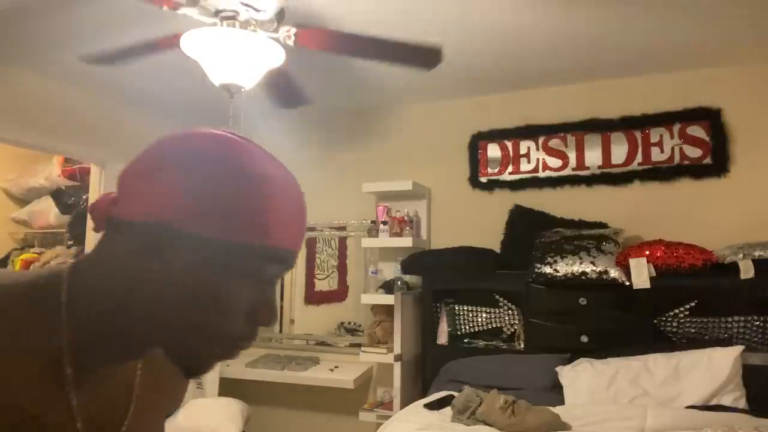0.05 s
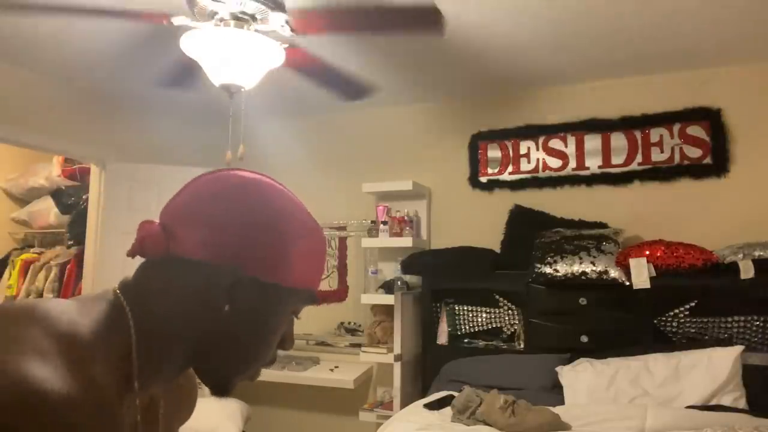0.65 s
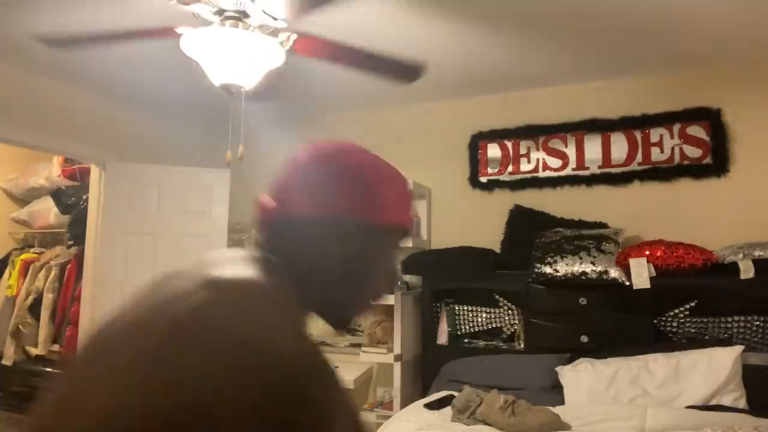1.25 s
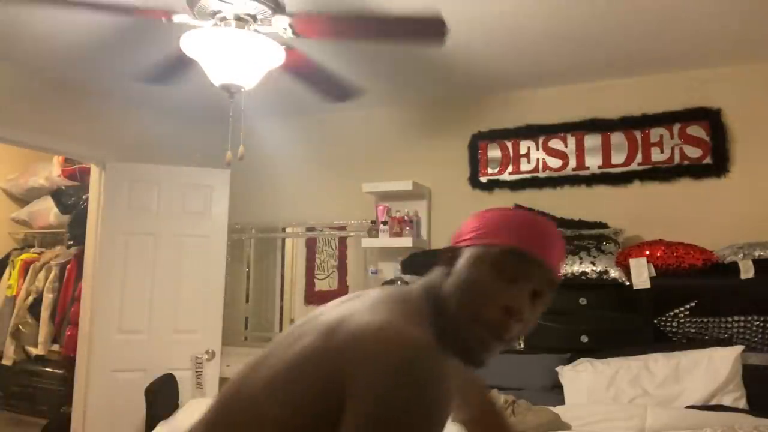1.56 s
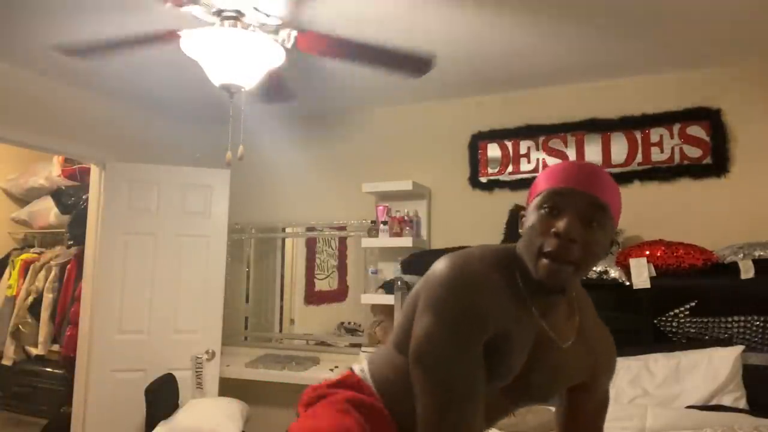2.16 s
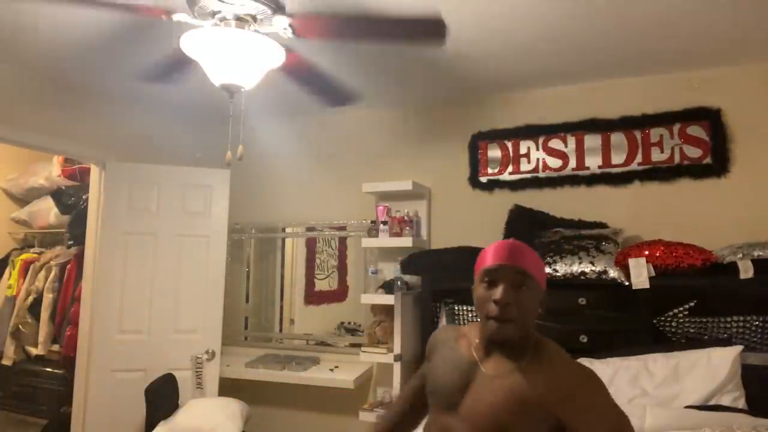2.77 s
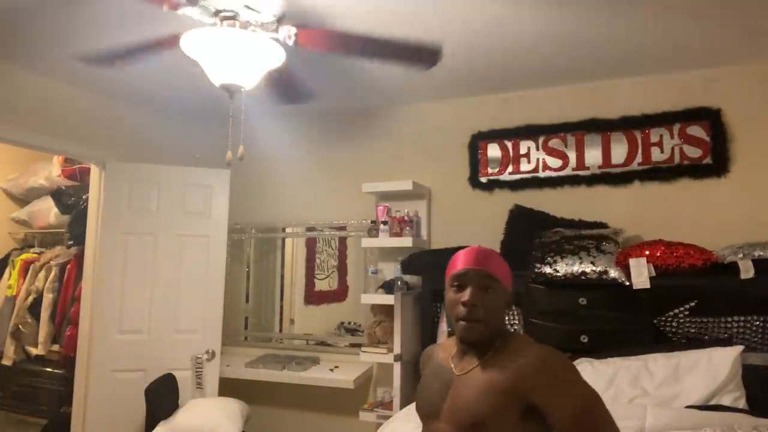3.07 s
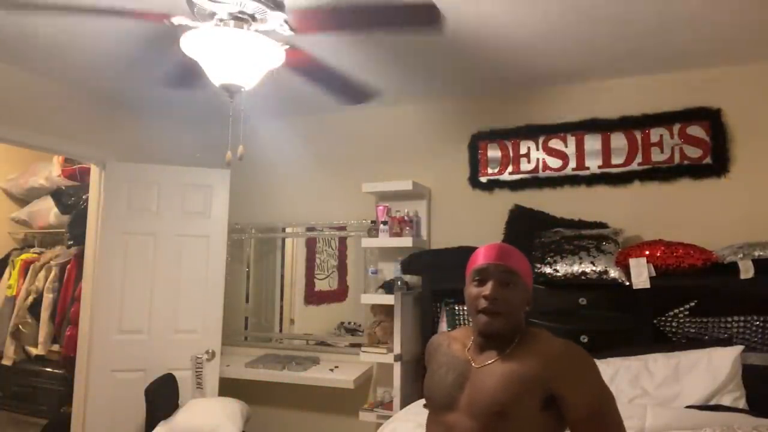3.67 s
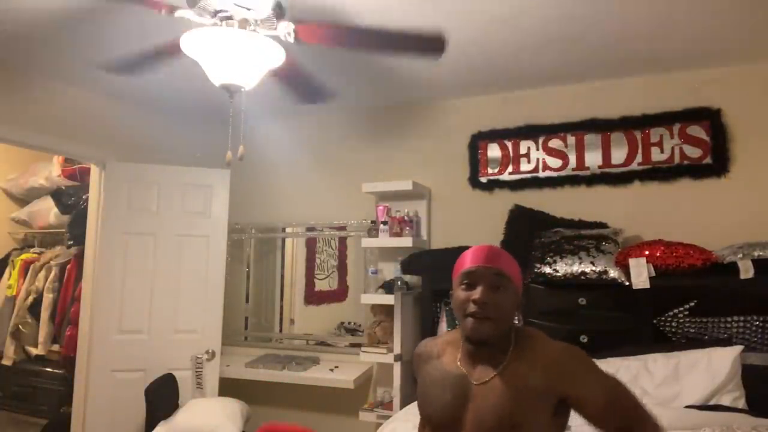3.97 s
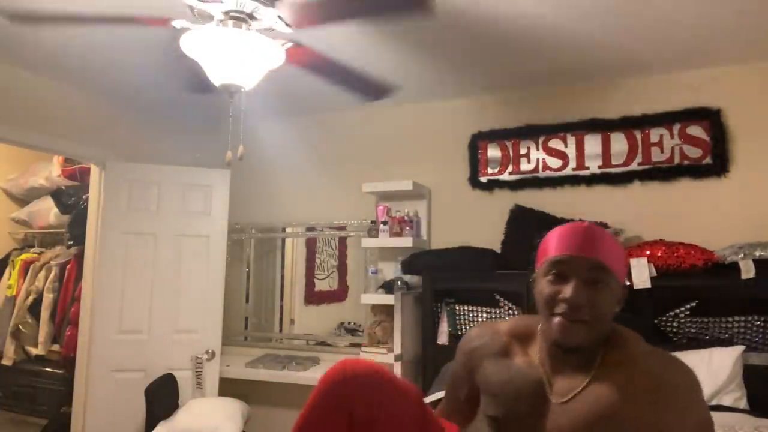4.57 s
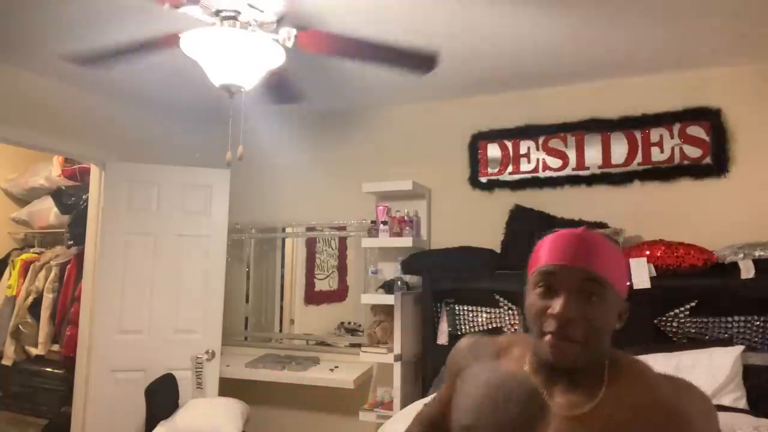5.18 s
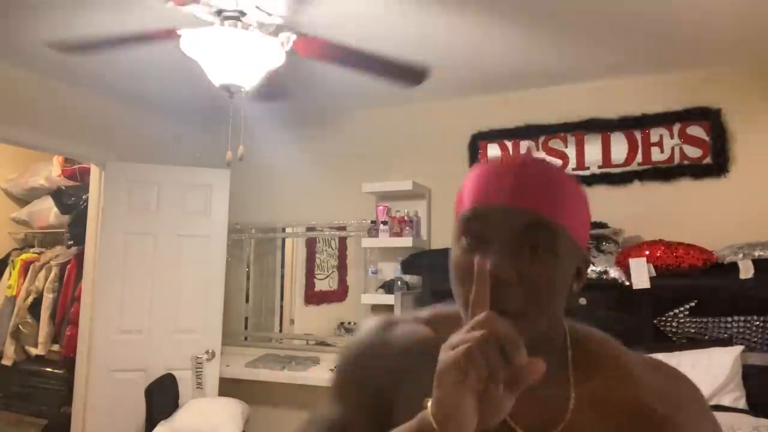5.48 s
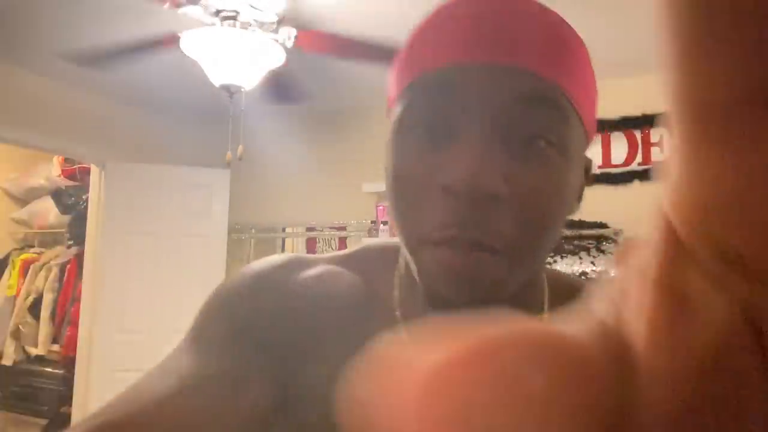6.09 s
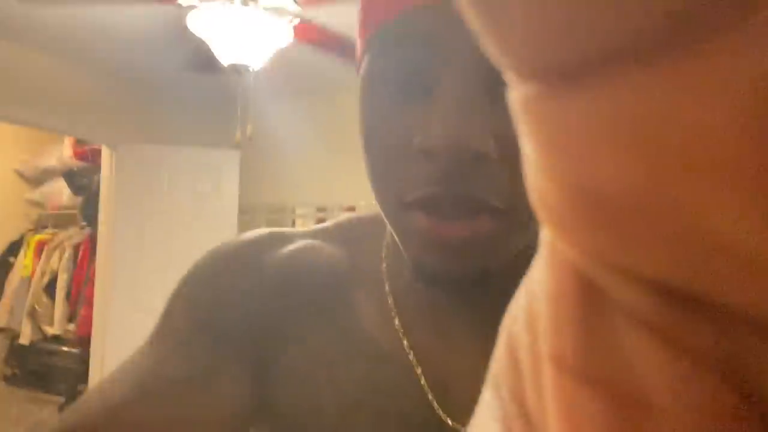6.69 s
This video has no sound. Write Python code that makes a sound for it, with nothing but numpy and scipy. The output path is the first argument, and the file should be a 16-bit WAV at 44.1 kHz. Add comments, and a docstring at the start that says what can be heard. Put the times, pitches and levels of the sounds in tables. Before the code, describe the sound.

A ceiling fan hums faintly throughout in a small bedroom. At about 0.3 seconds a low puff of air hits the phone's microphone, with light swishing of sheets. From 1.2 to 3 seconds someone shuffles across the bed: heavy folds drag and catch, skin scrapes taut cloth, and the mattress rumbles and thumps softly, most strongly around 2.5 seconds. The mattress settles with a muffled bump at 3.3 seconds, and a small object is tapped lightly at 3.7. From 3.9 to about 5.8 seconds the rustling and soft bumps resume. Just after 6 seconds a hand brushes the phone with a brief hiss and fingers thud onto it. From 6.3 to 6.8 seconds skin sticks and slips on the case right beside the microphone in a quick run of short creaks, with thuds, rubbing and low rumble, much louder than everything before.

```python
"""A ceiling fan hums in a small bedroom. A low puff of air hits the microphone, then someone shuffles
across the bed: heavy folds drag, the sheet swishes and catches, skin scrapes taut cloth, and the mattress
thumps and rumbles. Midway something is tapped lightly in the room. Near the end a hand brushes the phone,
then grips it: fingers thud, and skin sticks and slips on the case right beside the microphones
in short, loud creaks."""
import sys
import numpy as np
from scipy import signal
from scipy.fft import rfft, irfft, next_fast_len
from scipy.io import wavfile
from scipy.ndimage import uniform_filter1d

SR = 44100
rng = np.random.default_rng(int(sys.argv[2]) if len(sys.argv) > 2 else 0)


def materialize(psi):
    """Save the field psi as 16-bit PCM at rate SR to the path in sys.argv[1].

    A 1-D psi becomes a single channel; in a 2-D psi each row is a channel.
    """
    bounded = np.clip(np.atleast_2d(psi).T, -1, 1)
    quanta = np.round(bounded * 32767).astype(np.int16)
    wavfile.write(sys.argv[1], SR, quanta)


N = 301644

# Levels in the tables are fader settings; the layers add their own trims.
# Body strokes over the bedding. Each row: fastest moment, rise and fall in seconds, drag and swish in dB.
BODY_STROKES = [(.055, 0.05, 0.065, -78, -61), (.31, 0.087, 0.11, -53.5, -54), (.42, 0.084, 0.12, -59, -58),
                (.7, 0.09, 0.08, -60.5, -52.5), (.76, 0.017, 0.049, -54, -71),
                (1.02, 0.077, 0.11, -61.5, -54), (1.17, 0.087, 0.059, -68, -59),
                (1.3, 0.34, 0.21, -59.5, -65), (1.345, 0.078, 0.025, -54.5, -63.5),
                (1.46, 0.048, 0.093, -55.5, -62), (1.585, 0.089, 0.08, -54, -56),
                (1.82, 0.12, 0.053, -65.5, -58), (1.885, 0.085, 0.076, -57, -49),
                (2.17, 0.16, 0.14, -57, -62.5), (2.27, 0.17, 0.1, -47.5, -51.5),
                (2.38, 0.068, 0.16, -61, -55.5), (2.52, 0.067, 0.075, -46, -51.5),
                (2.61, 0.087, 0.067, -43, -49.5), (2.8, 0.14, 0.074, -51, -60),
                (2.93, 0.14, 0.061, -57, -65), (3.025, 0.048, 0.088, -55.5, -79),
                (3.94, 0.093, 0.11, -54, -57), (4.12, 0.045, 0.12, -52.5, -60.5),
                (4.31, 0.1, 0.051, -57.5, -57), (4.49, 0.18, 0.079, -55.5, -55.5),
                (4.66, 0.14, 0.9, -55.5, -61), (4.85, 0.25, 0.11, -76, -56.5),
                (5.02, 0.035, 0.63, -66, -58), (5.22, 0.34, 0.16, -56.5, -61.5),
                (5.51, 0.067, 0.15, -57, -55.5), (5.66, 0.033, 0.065, -55, -60),
                (5.8, 0.058, 0.12, -56, -66), (6.08, 0.039, 0.09, -66, -61.5), (6.26, 0.11, 0.18, -56, -64)]
# Folds that catch and let go. Each row: start in seconds, level in dB, decay in seconds.
FOLD_CATCHES = [(1.501, -33.5, 0.02), (2.236, -31.5, 0.033), (2.279, -35.5, 0.03), (2.553, -37, 0.016),
                (2.579, -37, 0.016), (2.616, -33, 0.021), (2.768, -42, 0.02), (2.796, -41, 0.018),
                (3.925, -37.5, 0.018), (4.28, -42.5, 0.027), (4.563, -38, 0.03), (5.14, -43.5, 0.031),
                (5.2, -36, 0.045), (5.505, -38.5, 0.031)]
# Skin on taut cloth. Each row: fastest moment, rise and fall in seconds, level in dB, pitch and
# nominal width in Hz.
SKIN_SCRAPES = [(1.48, 0.04, 0.049, -51, 2320, 200), (1.59, 0.03, 0.059, -50.5, 2600, 450),
                (1.868, 0.027, 0.055, -42.5, 2160, 523), (2.105, 0.035, 0.035, -50, 1680, 90),
                (2.292, 0.015, 0.022, -40, 1780, 220), (2.46, 0.039, 0.062, -46.5, 1680, 220),
                (3.035, 0.0091, 0.023, -55.5, 2420, 600)]
# Soft bumps on the bed. Each row: start in seconds, peak in dB, mid-glide pitch in Hz, rise in seconds.
BED_BUMPS = [(1.96, -30.5, 88, 0.017), (2.36, -25.5, 43.2, 0.041), (2.49, -31.5, 186, 0.0095),
             (2.511, -24, 71, 0.0088), (2.755, -24, 65.4, 0.015), (2.795, -29, 179.5, 0.02),
             (2.925, -30.5, 170, 0.018), (2.997, -25, 89, 0.014), (3.342, -29, 169, 0.011),
             (3.926, -33.5, 178, 0.012), (4.125, -37, 170, 0.00386), (4.29, -34, 172, 0.011),
             (4.572, -26, 265, 0.0027), (4.59, -30, 173, 0.0054), (4.712, -29, 81.4, 0.014),
             (4.735, -32.5, 196, 0.012), (5.05, -31, 70, 0.007), (5.201, -27, 207, 0.0026),
             (5.587, -33, 85, 0.0057)]
# A low puff of air on the microphone at 0.3 s, then weight shifting on the bed.
# Each row: time in seconds, rumble in dB, deep sway in dB.
PUFF_AND_WEIGHT = [(0, -68, -73), (.22, -76, -44), (.3, -61, -29.5), (.4, -49, -37), (.9, -60.5, -62),
                   (1.22, -50, -41.5), (1.36, -41.5, -41.5), (1.6, -46, -40.5), (1.76, -59, -47),
                   (2.0, -51, -41), (2.5, -42.5, -32.5), (3.03, -41.5, -34.5), (3.15, -47, -35.5),
                   (3.7, -60.5, -41.5), (3.95, -41, -35.5), (4.6, -41.5, -31), (5.7, -45.5, -45),
                   (6.0, -56.5, -60), (6.2, -59, -35.5)]

# Runs of skin slips on the case. Each row: start in seconds, number of slips, spacing in seconds, knock
# pitch in Hz, then knock, snap, ring and grit in dB, and leftward pan in dB before PAN_WIDTH scales it.
GRIP_CREAKS = [(6.2821, 1, 0, 560, -32.5, -39, -56, -63, 11), (6.312, 1, 0, 1100, -36, -40, -45, -64, 3),
               (6.3201, 1, 0, 790, -26.5, -25, -28, -38, -1), (6.3289, 1, 0, 900, -28, -40, -30, -41, 0),
               (6.3315, 1, 0, 1100, -21.5, -13, -16.5, -30, 7),
               (6.3707, 1, 0, 1000, -31, -41, -50, -56, -1),
               (6.38, 3, 0.0034, 1000, -26, -20, -42, -42.5, 4),
               (6.4339, 1, 0.0043, 800, -27, -30, -31, -32, 1), (6.44, 1, 0, 695, -24, -32, -32, -38, 4),
               (6.451, 1, 0, 700, -22, -27, -31, -31, -4), (6.4603, 2, 0.0028, 950, -25, -31, -29, -34, 3),
               (6.4709, 1, 0, 590, -21, -25.5, -31, -33, -1), (6.48, 1, 0, 1000, -27, -26.5, -28, -30.5, 2),
               (6.5552, 2, 0.0022, 900, -23.5, -26.5, -20.5, -24.5, 2),
               (6.5734, 2, 0.0033, 670, -20, -27, -25, -24.5, -3),
               (6.6265, 3, 0.0024, 920, -17, -38, -23.5, -23, 0),
               (6.7049, 2, 0.0022, 1050, -24, -32, -20, -24.5, 1),
               (6.7154, 1, 0, 600, -27.5, -31, -22.5, -35, -8),
               (6.7323, 1, 0, 950, -21, -32, -25, -24.5, 1), (6.754, 1, 0, 1000, -37, -37, -44, -53, 2),
               (6.7645, 1, 0, 930, -21.5, -25.5, -25.5, -24, 5),
               (6.7746, 1, 0, 1000, -40, -42, -50, -53, 4)]
# Resonances of the case and microphone ports. Each row: centre and width in Hz, left and right in dB.
CASE_RESONANCES = [(564, 200, 5, 4.5), (966, 170, 5.5, 3), (1120, 170, 5, 3.5), (1770, 550, 4, 5.5),
                   (2144, 190, 5.5, 1), (2710, 163, 7, 12.5), (4360, 930, -5, 0.5), (5790, 190, -24, 1),
                   (7250, 410, -11, -39), (11800, 1900, -12, -15)]
# Fingers pressing. Each row: start in seconds, peak in dB, mid-glide pitch in Hz, rise in seconds.
FINGER_THUDS = [(6.101, -26, 144, 0.0067), (6.121, -15.5, 81.5, 0.0069), (6.283, -19.5, 226, 0.0013),
                (6.378, -16.5, 306, 0.0071), (6.564, -22.5, 190, 0.0058), (6.582, -21, 292, 0.003),
                (6.635, -27, 110, 0.0076), (6.692, -24, 120, 0.012), (6.764, -26.5, 332, 0.0036)]
# The hand squeezing. Each row: hardest moment, rise and fall in seconds, rumble and deep sway in dB.
HAND_SQUEEZES = [(6.305, 0.018, 0.071, -30, -29), (6.385, 0.023, 0.035, -27.5, -26),
                 (6.47, 0.031, 0.027, -33.5, -33), (6.575, 0.028, 0.052, -27.5, -33),
                 (6.74, 0.045, 0.07, -35, -27.5)]
# The palm sliding on the case. Each row: time in seconds, level in dB.
PALM_SLIDE = [(6.25, -37), (6.332, -34.5), (6.42, -43), (6.52, -55), (6.575, -25), (6.61, -37),
              (6.645, -43), (6.68, -42), (6.79, -50), (6.84, -73)]
# The hand brushing past. Each row: fastest moment, rise and fall in seconds, level in dB.
HAND_BRUSHES = [(5.5, 0.026, 0.04, -68), (6.068, 0.021, 0.039, -51)]

# Motor and blade tones of the fan. Each row: pitch in Hz, level in dB.
FAN_TONES = [(56, -44.5), (74, -49), (103, -53), (194, -72), (245, -63.5)]
# How alike the two microphones hear the room. Each row: frequency in Hz, coherence from 0 to 1.
MIC_COHERENCE = [(120, 1), (320, 0.96), (550, 0.57), (850, 0.23), (1400, 0.49), (3500, 0.02), (6000, 0.38),
                 (9500, 0.031), (14000, 1)]

# EQ curves that voice the noise layers. Each row: frequency in Hz, relative level in dB.
DRAG_EQ = [(200, -3), (400, 2), (650, -0.5), (880, 0), (1150, -6), (1420, -8), (1700, -6), (1950, -9),
           (2300, -4), (2700, -15.5), (3300, -14), (6000, -27.5), (12000, -42), (14000, -69)]  # heavy folds
SWISH_EQ = [(600, 0), (1000, 4), (1300, 8), (1650, -1), (1900, 8), (2130, 8.5), (2330, 10.5), (2530, 3.5),
            (2900, 7.5), (3300, 3.5), (5000, 0.5), (7000, -2), (10000, -4.5), (12500, -8.5), (13800, -9),
            (16000, -42)]  # the sheet
JOLT_EQ = [(150, -2), (300, 0), (500, -13), (750, -17), (1100, -12), (1400, -23), (2400, -50)]  # the mattress settling
MATTRESS_EQ = [(70, -3), (140, 4), (200, 2), (310, -1), (450, -11), (800, -17.5)]  # springs and padding
SWAY_EQ = [(18, -37), (35, -2), (58, 14), (90, 9.5), (125, 1.5), (220, -57)]  # the deep low end of the air puff, the bed and the grip
PALM_EQ = [(300, 0), (3000, -4), (6000, -7.5), (9500, -10), (12000, -28)]  # the soft palm dulls its own rubbing
BRUSH_EQ = [(3000, -16), (6000, -7), (10000, 0), (12500, -1), (14500, -16)]  # thin hiss of dry skin
SOFT_EQ = [(300, -3), (3000, -3.5), (6000, -4), (10000, -1.5), (12500, -18)]  # what skin and soft furnishings let through
TAP_EQ = [(500, -16), (1100, -10), (1400, 7), (1850, -9), (2350, 0), (2900, -3), (3600, -7), (4600, -19),
          (6000, -36)]  # ring of the tapped object
AIR_EQ = [(25, -37), (55, -10), (100, -2), (150, -28), (320, -24), (480, -44), (1000, -47), (1600, -46),
          (2800, -52), (5000, -57.5), (12000, -57), (14000, -83)]  # air off the fan

STIR_DB = (-78, -86)  # faint drag and swish between strokes
GRIP_START_S, SLIP_S = 6.27, 0.004
CASE_DETUNE, PAN_WIDTH = 0.029, 0.64  # the grip retunes the case from slip to slip
KNOCK_Q = 1.6  # sharpness of the hollow under the finger, which pitches each knock
PORT_LAG_S, THUD_LAG_S = 3.6e-5, 0.00025
LEFT_ONLY = np.array([[1], [0]])
ROOM_T60_S, WALLS_DB = 0.22, -5  # WALLS_DB: reflections that reach both ports alike
TOP_HZ = 16450


def bedding(drag_gain, swish_gain):
    """Heavy folds drag and the sheet swishes in the same uneven jerks, fading once the hand grips."""
    jerks_db = 2.65 * walk(45)
    drag = in_room(fibres(spread_db=2), DRAG_EQ) * drag_gain * undb(jerks_db + 7)
    swish = in_room(fibres(spread_db=4), SWISH_EQ) * swish_gain * undb(0.72 * jerks_db + 7.5)
    since_grip = np.maximum(np.arange(N) / SR - GRIP_START_S, 0)
    cloth = (drag + swish) * np.exp(-since_grip / 0.12)
    return np.std(cloth) * shifting_folds(cloth, depth_db=2.6, rate=16)


def shifting_folds(cloth, depth_db, rate):
    """Folds open and close: each fifth of an octave swells and fades on its own."""
    place = 5 * np.log2(np.clip(np.fft.rfftfreq(N, 1 / SR), 400, 6400) / 400)
    spectrum = rfft(cloth)
    bands = (irfft(spectrum * np.maximum(1 - abs(place - k), 0), N) for k in range(round(place[-1]) + 1))
    return unit(sum(band * undb(depth_db * walk(rate)) for band in bands))


def catches():
    """A taut fold lets go at once and its rustle dies away."""
    rustle = in_room(fibres(spread_db=6), DRAG_EQ)
    swish = undb(-18) * in_room(rng.standard_normal((3, N)), SWISH_EQ)
    return releases(FOLD_CATCHES) * (rustle + swish)


def scrapes():
    """Snags of the weave pass evenly under sliding skin, so each scrape sings at its own pitch."""
    size = next_fast_len(N)
    hz = np.fft.rfftfreq(size, 1 / SR) + 1
    snags = rfft(in_room(fibres(spread_db=4), SOFT_EQ), size)
    out = np.zeros((2, N))
    for *stroke, centre, width in SKIN_SCRAPES:
        singing = irfft(snags * resonance(hz, centre, 1.26 * width) ** 2, size)[:, :N]
        out += swells([stroke]) * unit(singing)
    return out


def creaks(size=4096):
    """Each slip of skin grinds briefly and rings the damped case; its low knock lands last and lingers."""
    out = np.zeros((2, N))
    t = (np.arange(size) - size // 4) / SR
    hz = np.fft.rfftfreq(size, 1 / SR) + 1

    def grind(body, lo_hz, hi_hz, width, delay, tail_db, lag, edge=12):
        """A friction burst in one register, rms 1 over SLIP_S; width, delay and lag are in seconds."""
        age = t - delay
        tail = undb(tail_db) * (age > 0) * np.exp(-abs(age) / 0.0097)
        envelope = np.exp(-(age / width) ** 2 / 2) + tail
        force = (rng.standard_normal(size) + 0.37 * rng.standard_normal((2, size))) * envelope
        band = 1 / np.sqrt((1 + (lo_hz / hz) ** 12) * (1 + (hz / hi_hz) ** edge))
        burst = irfft(rfft(force) * body * band * left_delay(hz, lag), size)
        return burst / np.sqrt(np.sum(burst ** 2) / (2 * SLIP_S * SR))

    for s, knock_hz, knock_db, snap_db, ring_db, grit_db, pan_db in stick_slip():
        case = case_response(hz * np.exp(CASE_DETUNE * rng.standard_normal()))
        hollow = case * resonance(hz, knock_hz, knock_hz / KNOCK_Q)
        knock = grind(hollow, 440, 1300, width=.0006, delay=0, tail_db=-25, lag=.00022)
        snap = grind(case, 1450, 2350, width=.0004, delay=-.0004, tail_db=-27, lag=.00006)
        ring = grind(case, 2550, 3500, width=.0004, delay=-.0005, tail_db=-34, lag=.00006)
        grit = grind(case, 3900, 10500, width=.00055, delay=-.0002, tail_db=-41, lag=.00003, edge=8)
        bite = undb(snap_db) * snap + undb(ring_db) * ring + undb(grit_db) * grit
        pan = undb(PAN_WIDTH * pan_db * np.array([[1], [-1]]) / 2)
        add(out, undb(knock_db) * knock + bite * pan, s + t[0])
    room_tail = undb(-22.5) * np.std(out) * colour(reverberate(out), SOFT_EQ)
    return out + room_tail


def stick_slip():
    """Within a creak the skin lets go at an even pace; yields each slip's time and voicing."""
    for s, count, gap, *voicing in GRIP_CREAKS:
        for k in range(round(count)):
            yield (s + k * gap, *voicing)


def case_response(hz, damping=1):
    """The case rings in several modes, each with its own strength at each port."""
    return sum(undb([[left], [right]]) * resonance(hz, centre, width * damping)
               for centre, width, left, right in CASE_RESONANCES)


def thumps(table, lag):
    """Each soft push swells, sinks in pitch and dies away; the left port gets it lag seconds late."""
    out = np.zeros((2, N))
    t = np.maximum(np.arange(SR // 3) / SR - lag * LEFT_ONLY, 0)
    for s, db, hz, rise in table:
        age = t / rise
        envelope = (age * np.exp(1 - age)) ** 2
        cycles = hz * rise * (0.882 * age + 0.5 * (1 - np.exp(-age / 2)))
        add(out, undb(db) * envelope * np.sin(2 * np.pi * cycles), s)
    return out


def rumble(drag_gain):
    """Air puffs on the microphone; then the bed rumbles under the body, and the phone under the hand."""
    squeeze = swells(HAND_SQUEEZES)
    low, sway = np.hypot(undb(curves(PUFF_AND_WEIGHT)), squeeze)
    shake = np.hypot(low, undb(4.5) * drag_gain)  # dragging folds shake the padding too
    padding = in_room(fibres(spread_db=0.5), MATTRESS_EQ) * shake * undb(2.96 * walk(18) - 1.35)
    handling = colour(rng.standard_normal((2, N)), MATTRESS_EQ) * squeeze[0] * undb(-9)  # each port's own
    sub = colour(rng.standard_normal(N), SWAY_EQ) * sway * undb(2 * walk(11) - 5)
    return padding + handling + sub


def palm():
    """Between slips the skin slides softly over the case."""
    level_db, = curves(PALM_SLIDE)
    case = case_response(np.fft.rfftfreq(N, 1 / SR) + 1, damping=0.72)
    rub = irfft(rfft(fibres(spread_db=-13)[:2]) * case, N)
    gripping = np.arange(N) / SR > GRIP_START_S
    return colour(rub, PALM_EQ) * undb(level_db - 9.5) * gripping


def brush():
    """Dry skin grazes the case with a brief, high hiss."""
    speed, = swells(HAND_BRUSHES)
    return speed * in_room(fibres(spread_db=3), BRUSH_EQ)


def jolt(start_s=3.345, level_db=-46.5, decay_s=0.028):
    """The mattress settles with a muffled thump."""
    return releases([(start_s, level_db, decay_s)]) * in_room(rng.standard_normal((3, N)), JOLT_EQ)


def tap(start_s=3.738, level_db=-54.5, decay_s=0.029):
    """A small object is tapped lightly and the room holds it briefly."""
    return releases([(start_s, level_db, decay_s)]) * in_room(fibres(spread_db=-3), TAP_EQ)


def fan():
    """Wavering motor and blade tones over a soft wash of air."""
    t = np.arange(N) / SR
    hum = sum(undb(db + 2.9 * walk(29)) * np.sqrt(2) * np.sin(2 * np.pi * hz * t + walk(7))
              for hz, db in FAN_TONES)
    return undb(-6) * hum + undb(-48) * in_room(rng.standard_normal((3, N)), AIR_EQ)


def in_room(streams, eq):
    """One stream arrives directly, right port first; two come off walls and furniture. All get the EQ."""
    direct = rfft(streams[0] + undb(WALLS_DB) * reverberate(streams[:1])[0])
    diffuse = rfft(reverberate(streams[1:]))
    share = np.clip(on_bins(MIC_COHERENCE), 0, 1)
    lag = left_delay(np.fft.rfftfreq(N, 1 / SR), PORT_LAG_S)
    return colour(irfft(np.sqrt(share) * direct * lag + np.sqrt(1 - share) * diffuse, N), eq)


def reverberate(channels):
    """Dense fading reflections of unit energy, a different set for each channel."""
    t = np.arange(SR // 2) / SR
    tails = rng.standard_normal((2, len(t))) * np.exp(-np.log(1000) * t / ROOM_T60_S)
    return np.array([signal.fftconvolve(x, r / np.linalg.norm(r))[:N] for x, r in zip(channels, tails)])


def fibres(spread_db, grain=16):
    """Three unrelated streams of tiny snags of uneven size, each grain samples long."""
    size = np.minimum(rng.exponential(size=(3, N // grain + 1)), 5)
    return rng.standard_normal((3, N)) * undb(spread_db * np.repeat(size, grain, axis=1)[:, :N])


def swells(table):
    """Moves gather speed and run out, their powers adding; one gain curve for each level column."""
    t = np.arange(N) / SR
    power = 0
    for s, rise, fall, *levels_db in table:
        since = np.clip((t - s) / np.where(t < s, rise, fall), -10, 10)
        speed = np.where(since < 0, np.exp(-since ** 2), 1 / np.cosh(2 * since))
        power = power + (undb(levels_db)[:, None] * speed) ** 2
    return np.sqrt(power)


def releases(table):
    """An envelope of sharp attacks that die away."""
    envelope = np.zeros(N)
    t = np.arange(SR // 4) / SR
    for s, db, decay in table:
        add(envelope, undb(db) * (1 - np.exp(-t / 0.000074)) * np.exp(-t / decay), s)
    return envelope


def resonance(hz, centre_hz, width_hz):
    """One damped resonance, gain 1 at its centre."""
    return 1 / (1 + 1j * (hz ** 2 - centre_hz ** 2) / (hz * width_hz))


def left_delay(hz, lag):
    """The phase shift that makes the left channel lag seconds late."""
    return np.exp(-2j * np.pi * hz * lag * LEFT_ONLY)


def colour(x, eq):
    """Apply an EQ curve, rolling off above its last point, at rms 1."""
    above = np.maximum(np.fft.rfftfreq(N, 1 / SR) / eq[-1][0], 1)
    return unit(irfft(rfft(x) * undb(on_bins(eq)) / above ** 2, N))


def on_bins(table):
    """A curve over log frequency, read at the bins of the spectrum."""
    hz, value = np.transpose(table)
    return np.interp(np.log(np.fft.rfftfreq(N, 1 / SR) + 1), np.log(hz), value)


def curves(table):
    """The columns of a time table as automation lanes, sample by sample."""
    s, *columns = np.transpose(table)
    return [np.interp(np.arange(N) / SR, s, column) for column in columns]


def walk(rate):
    """Smoothed random sample-and-hold, rate steps a second, at rms 1."""
    hold = max(int(SR / rate), 1)
    held = np.repeat(rng.standard_normal(N // hold + 1), hold)
    return unit(uniform_filter1d(uniform_filter1d(held, hold), hold)[:N])


def add(out, x, s):
    """Mix a sound in at s seconds."""
    i = max(int(s * SR), 0)
    out[..., i:i + x.shape[-1]] += x[..., :max(N - i, 0)]


def undb(db):
    """Decibels to gain."""
    return 10 ** (np.asarray(db) / 20)


def unit(x):
    """Scale to rms 1."""
    return x / np.sqrt(np.mean(x ** 2) + 1e-18)


def scene():
    """Bed and hand up front, over the rumble, the tap and the fan."""
    drag, swish = np.hypot(swells(BODY_STROKES), undb(STIR_DB)[:, None])
    bed = bedding(drag, swish) + catches() + scrapes() + jolt() + thumps(BED_BUMPS, PORT_LAG_S)
    hand = brush() + palm() + creaks() + thumps(FINGER_THUDS, THUD_LAG_S)
    return bed + hand + rumble(drag) + tap() + fan()


def record(dry):
    """The phone clips at full scale and cuts the top."""
    high_cut = signal.ellip(10, .2, 80, TOP_HZ, fs=SR, output="sos")
    return signal.sosfilt(high_cut, np.clip(dry, -1, 1))


dry = scene()
out = record(dry)
materialize(out)
```